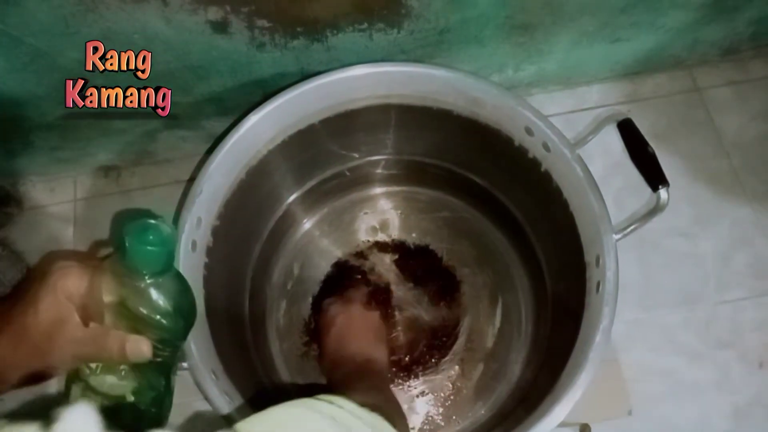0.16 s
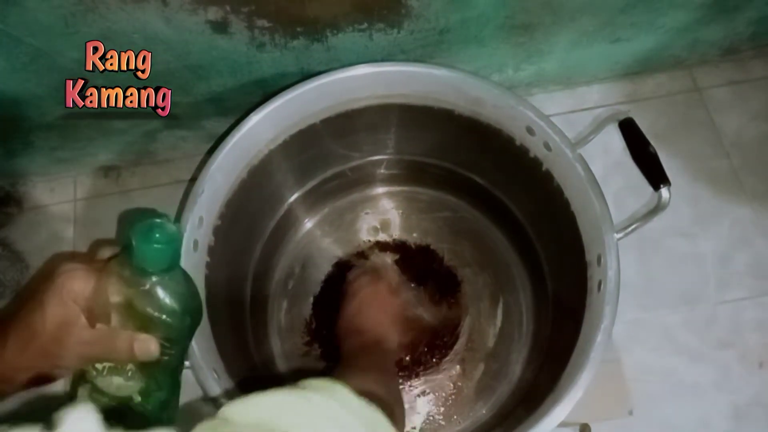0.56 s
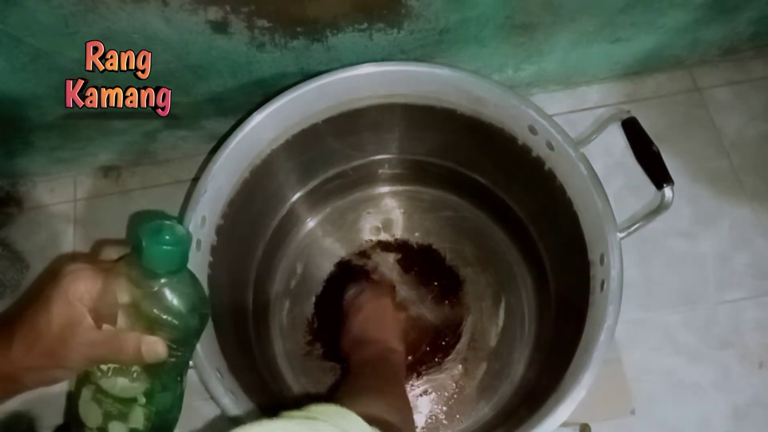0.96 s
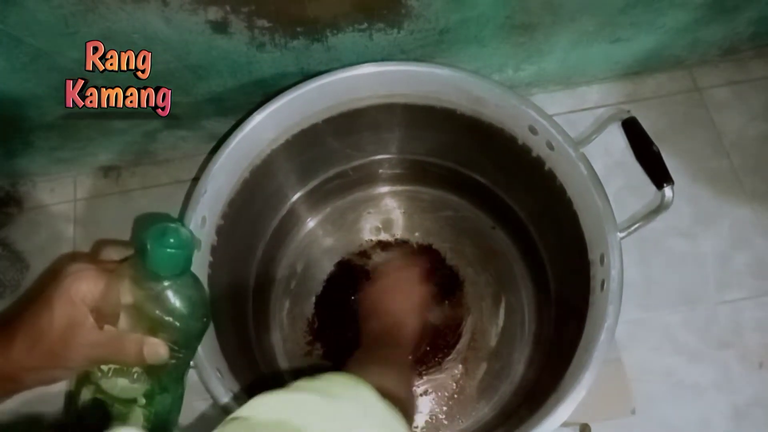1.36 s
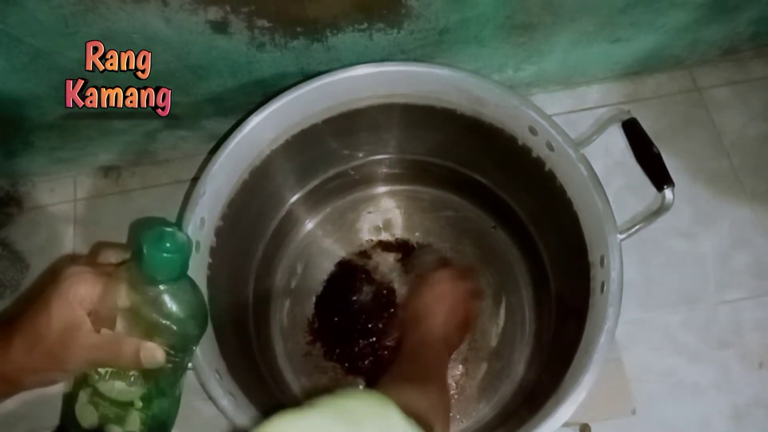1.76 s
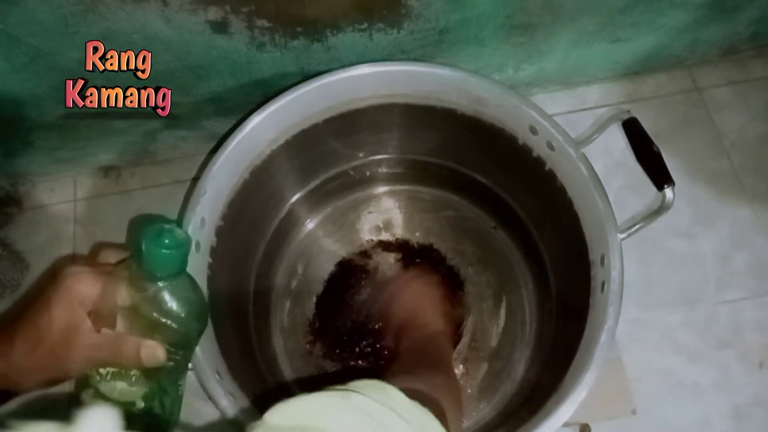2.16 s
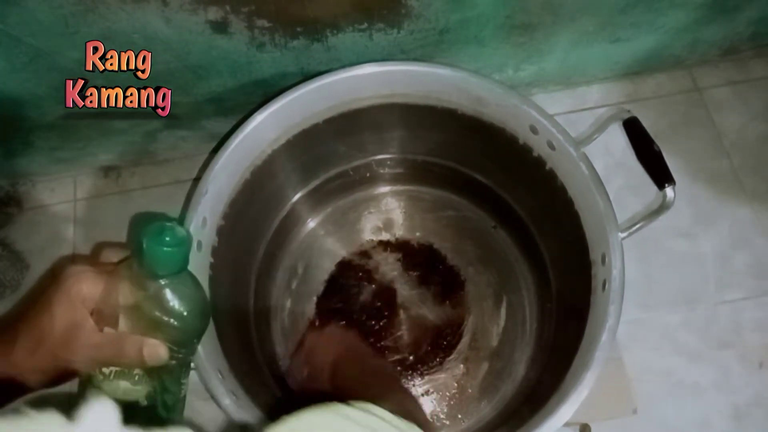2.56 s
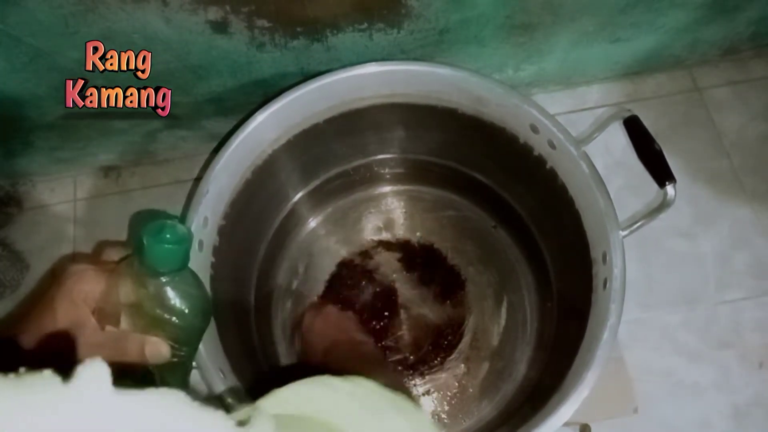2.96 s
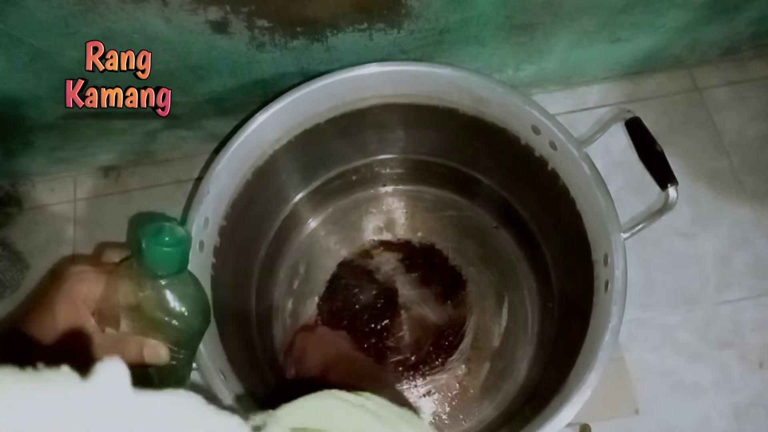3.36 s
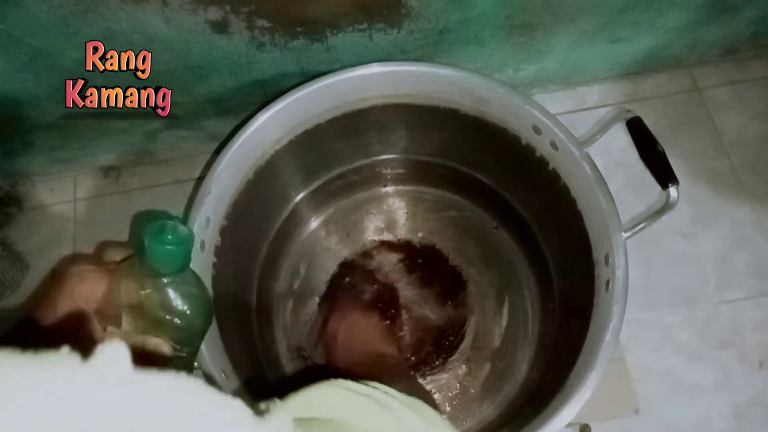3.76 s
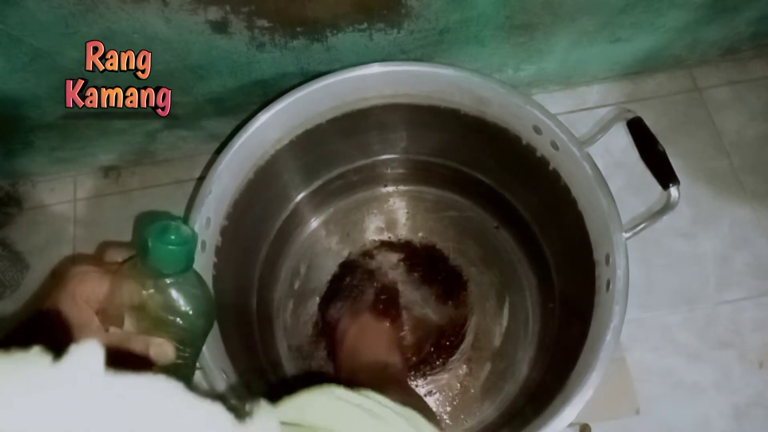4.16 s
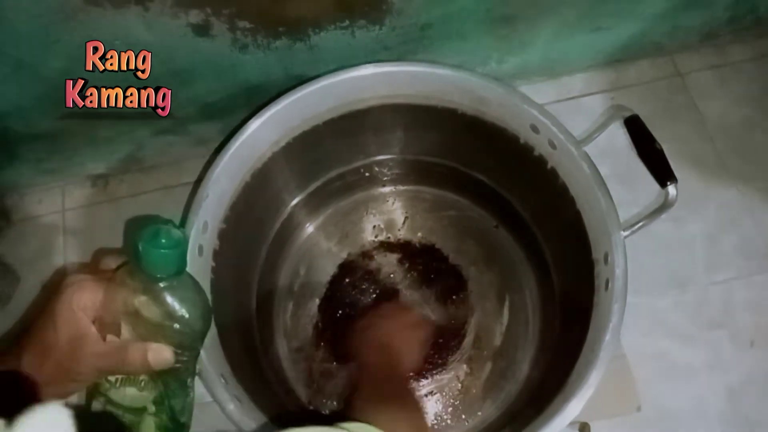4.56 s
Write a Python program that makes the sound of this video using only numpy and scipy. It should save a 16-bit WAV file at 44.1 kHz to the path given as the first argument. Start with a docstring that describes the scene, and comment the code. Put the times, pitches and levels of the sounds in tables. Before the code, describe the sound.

A metal scouring pad scrubs the wet, crusted bottom of a big aluminium pot in quick uneven strokes, then cuts off dead.

```python
"""A metal scouring pad scrubs the wet, burnt bottom of a big aluminium pot, close up, over a faint rumble.
From a light return onward, firm pushes alternate with light returns: the wires catch and slip in dense
ticks that ring the pot, and the coils judder under the hand and drive its low modes.
A soft dull bump falls in mid-push at 1.4 s, and a hard one in another push at 2.4 s.
During the last push, at 4.2 s, the sound stops dead and silence follows."""
import sys
import numpy as np
from scipy import signal
from scipy.fft import rfft, irfft
from scipy.io import wavfile

SR = 44100
rng = np.random.default_rng(int(sys.argv[2]) if len(sys.argv) > 2 else 0)


def wrap_up_sound(samples):
    """Save the sound to the file named by the first command line argument, as 16-bit audio."""
    columns = np.atleast_2d(samples).T
    # keep every value between -1 and 1, then stretch to whole-number steps
    tamed = np.clip(columns, -1, 1)
    steps = np.round(tamed * 32767).astype(np.int16)
    wavfile.write(sys.argv[1], SR, steps)


N = 208236
TIME = np.arange(N) / SR


def undb(db):
    """Decibels to gain."""
    return 10 ** (np.asarray(db) / 20)


def unit(x):
    """Scale to rms 1."""
    return x / np.sqrt(np.mean(x ** 2))


def walk(rate):
    """Random wander with rms 1, through a new random point `rate` times a second."""
    knots = rng.standard_normal(8192)
    return unit(np.interp(TIME * rate, np.arange(len(knots)), knots))


def colour(x, points):
    """Filter by a spectrum of (Hz, dB) points, joined on a log frequency scale."""
    hz, db = np.transpose(points)
    bins = np.arange(len(x) // 2 + 1) * SR / len(x)
    gain = undb(np.interp(np.log(bins + 1), np.log(hz), db))
    return irfft(rfft(x) * gain, len(x))


# colour of the background rumble: (f/Hz, relative level/dB)
RUMBLE_COLOUR = [(25, -37), (60, -18.5), (115, 6), (170, -5.5), (400, -27.5), (1000, -25), (3000, -14.5),
                 (5200, -48), (15000, -46.5)]
RUMBLE_DB = -56  # middle of a slow wander


def kitchen(x, wet_db, t60):
    """Faint reverberation from the tiled room, as decaying noise, over a low rumble of filtered noise."""
    t = TIME[:SR // 2]
    tail = rng.standard_normal(len(t)) * np.exp(-np.log(1000) * t / t60) * (t > .006)
    tail = signal.sosfilt(signal.butter(1, 3500, fs=SR, output="sos"), tail / np.linalg.norm(tail))
    reverb = undb(wet_db) * signal.fftconvolve(x, tail)[:N]
    rumble = unit(colour(rng.standard_normal(N), RUMBLE_COLOUR))
    return x + reverb + rumble * undb(RUMBLE_DB + 1.5 * walk(2.4))


# the pad bumps the pot in mid-stroke: (t/s, thud peak level/dB, contact time/s)
BUMPS = [(1.406, -31, .003), (2.4453, -9.5, .0018)]
# the noise burst of a bump: (peak level relative to the thud/dB, decay time/s, centre f/Hz, width f/Hz)
BUMP_NOISE = (-8.5, 0.05, 1801, 2999)
BUMP_HZ, BUMP_WIDTH_HZ = 125, 125


def bump():
    """Each bump pushes a heavily damped low resonance; noise from contact fades over about a tenth of a second."""
    noise_db, decay, noise_hz, noise_width = BUMP_NOISE
    thud_filter = signal.iirpeak(BUMP_HZ, BUMP_HZ / BUMP_WIDTH_HZ, fs=SR)
    noise_filter = signal.iirpeak(noise_hz, noise_hz / noise_width, fs=SR)
    out = 0
    for start, peak_db, contact in BUMPS:
        push = np.sin(np.pi * np.clip((TIME - start) / contact, 0, 1)) ** 2
        thud = signal.lfilter(*thud_filter, push)
        fading = rng.standard_normal(N) * (TIME > start) * np.exp(-np.abs(TIME - start) / decay)
        burst = signal.lfilter(*noise_filter, fading)
        blow = thud / np.abs(thud).max() + undb(noise_db) * burst / np.abs(burst).max()
        out = out + undb(peak_db) * blow
    return out


def slips(per_s, scatter_db):
    """Random ticks of either sign, mostly small and a few large, scaled to rms 1."""
    happens = rng.random(N) < per_s / SR
    size = undb(scatter_db * np.minimum(rng.exponential(size=N), 4))
    sign = np.sign(rng.standard_normal(N))
    return unit(happens * size * sign)


def places(count):
    """Wandering shares of a few spots on the pot's bottom, constant in total power."""
    shares = np.array([walk(12) for _ in range(count)])
    return shares / np.linalg.norm(shares, axis=0)


# modes of the pot, damped by hand and water: (f/Hz, width f/Hz, relative level/dB)
POT_MODES = [(277.4, 21, 4.5), (367, 22, -22.5), (461, 12, -13.5), (597, 150, -9), (822, 40, -1),
             (1053, 32, -1.5), (1260, 33, -4), (1600, 11, 0.5), (1910, 14, -8.5), (2310, 41, -9),
             (2635, 45, -3), (2950, 18, -11.5), (3450, 15, -7), (3497, 65, -14.5), (3630, 37, -25),
             (3860, 18, -4.5), (4210, 16, -21), (4594, 33, -5.5), (7460, 22, -7.5)]


def pot(x, ring_db, echo_db, echo_t60):
    """Ticks heard directly, through the pot's modes, and as a short wash of echoes from its walls."""
    # the pad travels over nodes and bellies, so every mode swells and fades by itself
    ring = 0
    for hz, width, db in POT_MODES:
        drive = x * undb(db + 5.6 * walk(11))
        ring = ring + signal.lfilter(*signal.iirpeak(hz, hz / width, fs=SR), drive)
    # the echo pattern changes with the pad's place
    t = TIME[:SR // 6]
    echoes = 0
    for share in places(count=5):
        wash = rng.standard_normal(len(t)) * np.exp(-np.log(1000) * t / echo_t60) * (t > .001)
        echoes = echoes + signal.fftconvolve(x * share, wash / np.linalg.norm(wash))[:N]
    heard = x + undb(ring_db) * ring + undb(echo_db) * echoes
    return heard * np.std(x) / np.std(heard)  # the pot changes the tone, not the overall level


# the pad catches on a ridge of crust and rasps harder for a moment: (t/s, stroke level jump/dB)
CATCHES = [(.116, 5.5), (.174, 3.5), (.425, 4), (.513, 3), (.559, 4), (1.003, 3), (1.396, 5), (1.72, 3.5),
           (2.277, 6), (2.329, 3), (2.444, 4), (2.782, 9), (3.749, 4.5), (4.15, 3.5)]
CATCH_RISE_S, CATCH_FADE_S = 0.003, 0.026


def gripping():
    """Changes of grip in dB: sudden catches that let go again, and uneven skidding over the crust."""
    catches = 0
    for start, jump_db in CATCHES:
        rise = np.clip((TIME - start) / CATCH_RISE_S, 0, 1)
        fade = np.exp(-np.maximum(TIME - start - CATCH_RISE_S, 0) / CATCH_FADE_S)
        catches = catches + jump_db * rise * fade
    skidding = walk(55) + 0.3 * walk(240)
    return catches, skidding


# the hand pushes the pad across the bottom: (t at full speed/s, attack/s, hold/s, release/s,
# scrape level before sag and catches/dB, base judder level relative to scrape/dB)
PUSHES = [(0.181, 0.14, 0.041, 0.1, -22, -6.0), (0.553, 0.085, 0.11, 0.11, -20.5, -7.5),
          (0.943, 0.076, 0.11, 0.14, -19.5, -7), (1.359, 0.076, 0.26, 0.088, -19.5, -6),
          (1.938, 0.065, 0.16, 0.13, -19.0, -7.5), (2.395, 0.071, 0.15, 0.098, -19.5, -6.5),
          (2.887, 0.064, 0.088, 0.14, -18.5, -5.5), (3.315, 0.1, 0.064, 0.1, -18.5, -7),
          (3.701, 0.053, 0.17, 0.077, -20, -6), (4.127, 0.096, 0.069, 0.1, -20.5, -5)]
# the hand draws the pad lightly back: (middle t/s, half length/s,
# scrape level before catches/dB, base judder level relative to scrape/dB)
RETURNS = [(0.018, 0.033, -27, -8), (0.326, 0.053, -30.5, -10), (0.728, 0.065, -31.5, -11),
           (1.184, 0.033, -34.5, -11), (1.778, 0.071, -27.5, -7), (2.21, 0.026, -29.5, -12.5),
           (2.65, 0.027, -37, -11), (3.129, 0.025, -33.5, -7.0), (3.542, 0.038, -36, -10.5),
           (3.624, 0.028, -36, -2.5), (3.982, 0.044, -27.5, -11.5)]
SAG_DB_PER_S = 16.5  # the pressure eases while the push is held
RAMP_DB, RAMP_BEND = 18, 1.23  # gain over the attack, lost over the release; the bend rounds the shoulders
REST_DB = -71.5  # the pad barely creeps between strokes


def strokes():
    """Scrape and judder levels in dB: firm pushes with attack, hold and release, and light return swells."""
    moves = []
    for full, attack, hold, release, db, judder_db in PUSHES:
        slowed = np.maximum(full - TIME, 0) / attack + np.maximum(TIME - full - hold, 0) / release
        sag_db = SAG_DB_PER_S * np.clip(TIME - full, 0, hold)
        moves.append((db - RAMP_DB * slowed ** RAMP_BEND - sag_db, judder_db))
    for middle, half, db, judder_db in RETURNS:
        # bell-shaped swell, 8.7 dB down at the half length
        moves.append((db - 20 / np.log(10) * ((TIME - middle) / half) ** 2, judder_db))
    scrape_power = sum(undb(db) ** 2 for db, _ in moves) + undb(REST_DB) ** 2
    judder_power = sum(undb(db + judder_db) ** 2 for db, judder_db in moves) + undb(REST_DB) ** 2
    return 10 * np.log10(scrape_power), 10 * np.log10(judder_power)


# broad colour of the pot's bottom shaken by the coils: (f/Hz, relative level/dB)
JUDDER_COLOUR = [(40, -38), (100, -15.5), (170, -10.5), (245, -11.5), (300, -2.5), (420, 2), (640, 4.5),
                 (725, 0), (830, 1), (1130, -1), (1300, 2), (1500, -11.5), (2400, -20.5)]


def coils(judder_db, grip):
    """Whole coils of the pad stick and let go, shaking the bottom of the pot."""
    jerks = unit(colour(slips(2500, scatter_db=3.0), JUDDER_COLOUR))
    return pot(jerks * undb(judder_db + 1.96 * grip), ring_db=0.0, echo_db=-2.5, echo_t60=0.13)


# broad colour of wires scraping on the pot: (f/Hz, relative level/dB)
SCRAPE_COLOUR = [(500, -25), (1400, -9.5), (2000, -8), (2500, -8), (3000, -1.5), (3500, -.5), (4150, -6.5),
                 (5200, -16), (6100, -8.5), (7100, -3), (8100, -6.5), (9500, -14), (12800, -14.5),
                 (15300, -6.5)]


def wires(scrape_db, sizzle_db, grip):
    """Wire edges tick over the crust, more often in a fast stroke; their tips add a bright sizzle."""
    speed = undb(.5 * (scrape_db - scrape_db.max()))
    ticks = colour(slips(14000 * speed + 1200, scatter_db=1.0), SCRAPE_COLOUR)
    body = signal.sosfiltfilt(signal.butter(4, 5200, fs=SR, output="sos"), ticks)
    sizzle = ticks - body  # what lies above the body
    scrape = unit(body) * undb(-4.5 + 0.4 * walk(41))
    scrape = scrape + unit(sizzle) * undb(sizzle_db + 1.4 * walk(60))
    return pot(scrape * undb(scrape_db + 0.5 * grip), ring_db=3.5, echo_db=-8.0, echo_t60=0.07)


FULL_STROKE_DB = -20  # scrape level from which effort is counted
# the wire tips sizzle more as the stroke gets harder
SIZZLE_DB, SIZZLE_DB_PER_DB = -1.08, 0.03
# the harder the stroke, the more the coils judder
SHAKE_DB, SHAKE_DB_PER_DB = -0.18, 0.0633
JUDDER_LAG_S = 0.0072  # the coils drag behind the wire tips


def scene():
    """The scrubbing in the kitchen with the dry bumps on top, the same in both ears."""
    catch_db, grip = gripping()
    scrape_db, judder_db = (db + catch_db for db in strokes())
    effort_db = scrape_db - FULL_STROKE_DB
    shaken_db = judder_db + SHAKE_DB + SHAKE_DB_PER_DB * effort_db
    lagging_db = np.interp(TIME - JUDDER_LAG_S, TIME, shaken_db)
    sizzle_db = SIZZLE_DB + SIZZLE_DB_PER_DB * effort_db
    scrubbing = coils(lagging_db, grip) + wires(scrape_db, sizzle_db, grip)
    mono = kitchen(scrubbing, wet_db=-23.5, t60=0.34) + bump()
    return np.array([mono, mono])


STOP_S, TOP_HZ = 4.205, 15600


def record(dry):
    """The phone cuts the deep bass and the top; the sound stops abruptly."""
    thin = signal.sosfilt(signal.butter(2, 45, "high", fs=SR, output="sos"), dry)
    stopped = thin * (TIME < STOP_S)
    return signal.sosfilt(signal.ellip(12, .2, 80, TOP_HZ, fs=SR, output="sos"), stopped)


dry = scene()
out = record(dry)
wrap_up_sound(out)
```